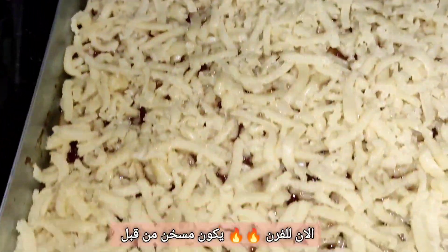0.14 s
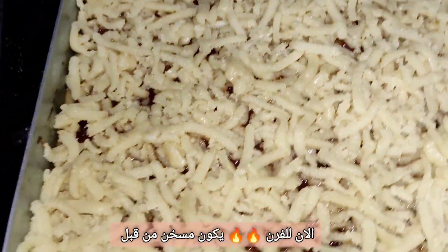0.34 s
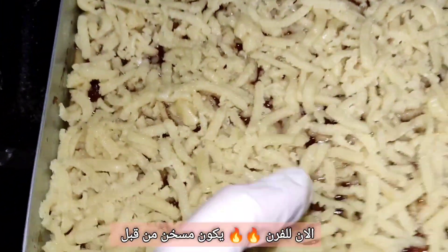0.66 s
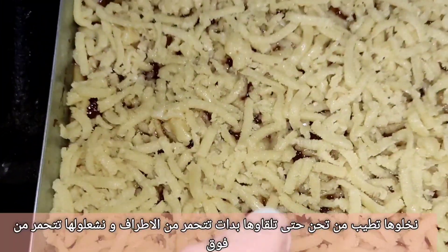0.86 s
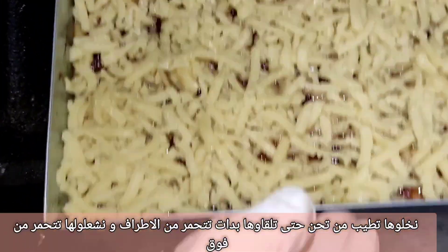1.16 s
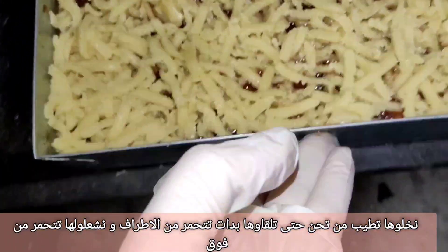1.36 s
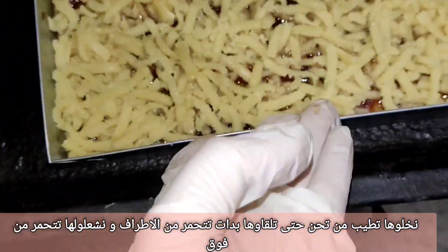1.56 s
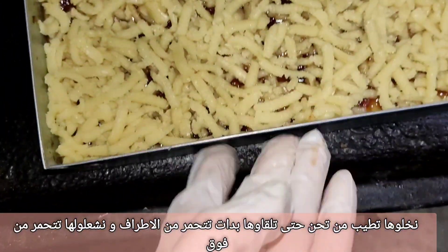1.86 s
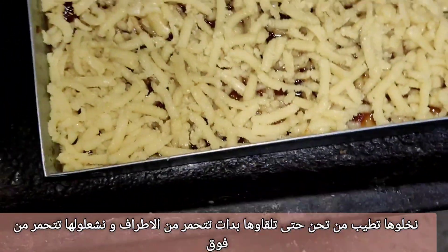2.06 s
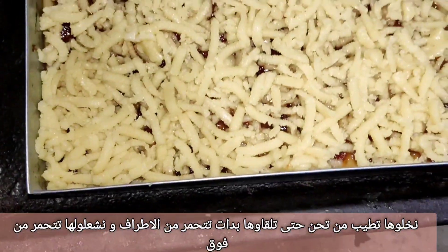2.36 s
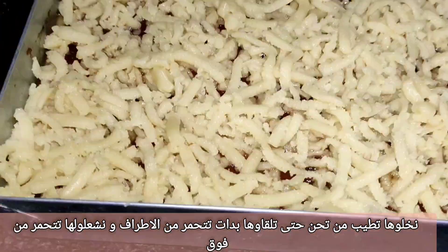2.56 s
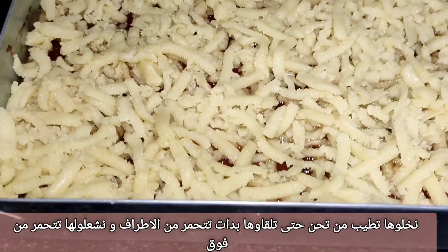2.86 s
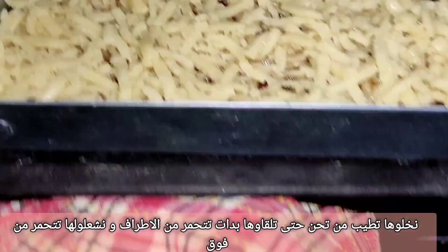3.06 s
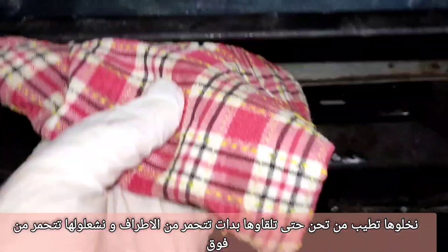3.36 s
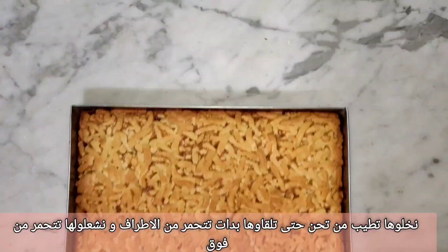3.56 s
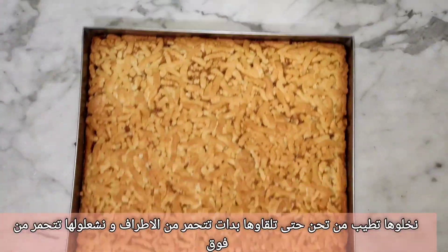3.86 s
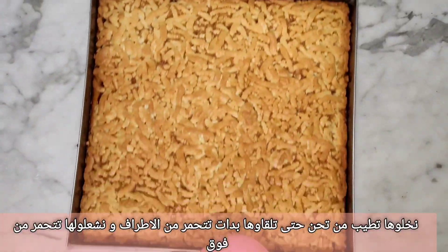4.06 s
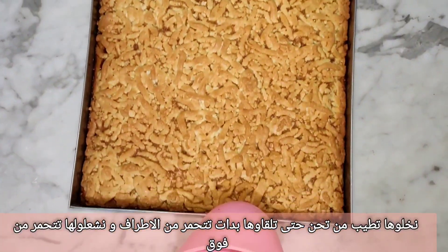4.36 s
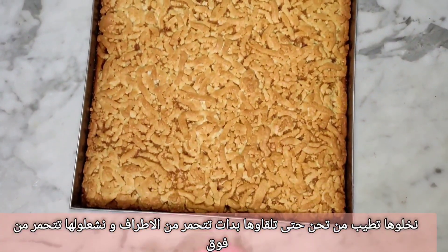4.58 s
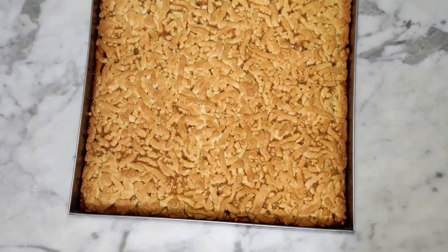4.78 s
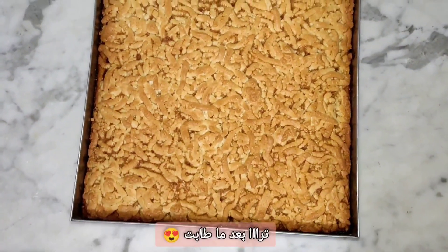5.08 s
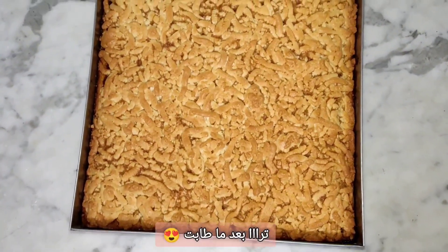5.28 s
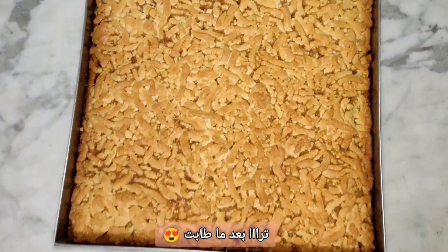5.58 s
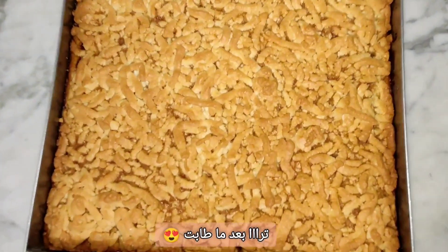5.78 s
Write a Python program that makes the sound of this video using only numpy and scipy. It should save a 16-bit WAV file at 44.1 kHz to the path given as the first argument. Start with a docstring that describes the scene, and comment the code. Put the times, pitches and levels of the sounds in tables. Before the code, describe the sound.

A low oven hum runs under the first part. At about 0.3 seconds a loaded metal baking tray starts scraping along the oven rack with small knocks, ending in the loudest, ringing clank near 0.8. A second push begins around 1.1, the rim juddering, and finishes in a clatter of ringing knocks at 1.5. A few small clicks follow. The sound drops out briefly at 2.6, then a lighter, hissing slide runs from 2.8 to 3.5, with two thuds around 3.2. At about 3.6 the sound breaks again and gives way to a quiet kitchen counter with faint electrical hum. A soft rustle lasts until about 4.4, with light taps and a faint high squeak. A soft hollow bump comes at 4.5, then tiny clicks, faint squeaks near 5 and a very thin whine to the end. The left microphone is bright, the right muffled.

```python
"""Baking tray on an oven rack

A loaded metal tray is pushed along the rack in three strokes over the oven's low hum: tiny slips
make it scrape, knocks set it ringing, its rim judders. The sound breaks off twice, then comes a
quiet kitchen counter: mains hum, a soft rustle, small taps, faint squeaks and a thin whine.
The left microphone is bright, the right one muffled."""
import sys
import numpy as np
from scipy import signal
from scipy.fft import rfft, irfft, next_fast_len
from scipy.io import wavfile

SR = 44100
rng = np.random.default_rng(int(sys.argv[2]) if len(sys.argv) > 2 else 0)


def materialize(psi):
    """Save the field psi as 16-bit PCM at rate SR to the path in sys.argv[1].

    A 1-D psi becomes a single channel; in a 2-D psi each row is a channel.
    """
    bounded = np.clip(np.atleast_2d(psi).T, -1, 1)
    quanta = np.round(bounded * 32767).astype(np.int16)
    wavfile.write(sys.argv[1], SR, quanta)


N = 261513
TIME = np.arange(N) / SR


def gain_of(db):
    return 10 ** (np.asarray(db) / 20)

def unit_rms(x):
    return x / np.sqrt(np.mean(x ** 2) + 1e-20)

def read(points, hz):
    """Look up a curve on a log-frequency axis."""
    f, value = np.transpose(points)
    return np.interp(np.log(hz + 1), np.log(f + 1), value)

def add(mix, s, sound):
    part = mix[..., round(s * SR):][..., :sound.shape[-1]]
    part += sound[..., :part.shape[-1]]

def cut(x, hz, side="low", order=2):
    return signal.sosfilt(signal.butter(order, hz, side, fs=SR, output="sos"), x)

def through(x, response):
    return signal.fftconvolve(np.atleast_2d(x), np.atleast_2d(response), axes=1)[:, :x.shape[-1]]

def eq(x, colour, size=4096):
    """Colour a sound with a minimum-phase filter of energy 1."""
    hz = abs(np.fft.fftfreq(size, 1 / SR))
    log_gain = np.log(gain_of(np.maximum(read(colour, hz), -100)))
    response = np.fft.ifft(np.exp(np.conj(signal.hilbert(log_gain)))).real[:size // 2]
    return through(x, response / np.linalg.norm(response))

def drift(per_s):
    """A smooth random wobble of rms about 1."""
    knots = np.arange(0, 7, 1 / per_s)
    return np.interp(TIME, knots, rng.standard_normal(4096)[:len(knots)])

def mode(hz, t60, lag=0):
    """One dying vibration; lag is in radians."""
    t = TIME[:33000]
    return np.sin(2 * np.pi * hz * t - lag) * gain_of(-60 * t / t60)

# Stereo image. Each row: frequency in Hz, left-right correlation.
LIKENESS = [(60, 0.79), (250, 0.87), (600, 0.48), (1100, 0.08), (3000, 0.6), (14000, 0.17)]

def spread(pair):
    """Blend two unrelated signals into stereo: narrow in the bass, wider above."""
    size = next_fast_len(pair.shape[1], True)
    left, other = rfft(pair, size)
    same = np.clip(read(LIKENESS, np.fft.rfftfreq(size, 1 / SR)), -1, 1)
    right = same * left + np.sqrt(1 - same ** 2) * other
    return irfft(np.array([left, right]), size)[:, :pair.shape[1]]

def stereo_noise(size):
    return spread(rng.standard_normal((2, size)))

def tail(decay):
    """Countless modes or echoes, each band dying at its own speed."""
    hz, t, bands = signal.stft(stereo_noise(SR // 2), SR, nperseg=256)
    out = signal.istft(bands * gain_of(-60 * t / read(decay, hz)[:, None]), SR, nperseg=256)[1]
    return out / np.linalg.norm(out[0])

def ambience(air, tones, air_db, waver_rad, flutter):
    """A bed of steady air noise and wavering hum."""
    bed = gain_of(air_db) * unit_rms(through(stereo_noise(N), 1.0) if not air else eq(stereo_noise(N), air))
    for hz, db in tones:
        level = np.sqrt(2) * gain_of(db) * (1 + flutter * drift(12))
        bed += level * np.sin(2 * np.pi * hz * TIME + waver_rad * drift(8))
    return bed

# The oven's air and hum. Each row: frequency in Hz, level in dB (relative for the air).
OVEN_AIR = [(20, -12.5), (45, -14), (75, -6.5), (110, -12.5), (200, -13.5), (240, -13), (290, -18.5),
            (450, -17.5), (700, -23.5), (1360, -31), (3200, -36.5), (6200, -44), (10800, -33), (14500, -41)]
OVEN_HUM = [(48.6, -49), (247.6, -62.5)]

def oven_hum():
    """The oven drones, low and nearly steady."""
    return ambience(OVEN_AIR, OVEN_HUM, air_db=-52.5, waver_rad=.15, flutter=.08)

# Modes of the tray on its rack. Each row: pitch in Hz, relative level in dB, t60 in seconds.
TRAY_MODES = [(77.2, -2.5, 0.31), (102.2, -1.5, 0.56), (119.2, -10.5, 0.28), (163.8, 1, 0.72),
              (190.4, 4, 0.74), (234, -5.5, 1), (342.9, -5, 0.77), (367, -3, 0.39), (445.4, -7.5, 0.64),
              (484.8, -9.5, 0.33), (526, -20, 0.17), (551, -9.5, 0.26), (622, -23, 0.72), (650, -1.5, 0.58),
              (750.5, -5.5, 0.2), (786, 1, 0.65), (901, -17, 0.46), (950, -8, 0.28), (1100, -20.5, 0.32),
              (1340, -12, .5), (1295, -8.5, 0.16), (2013, -24.5, 0.2), (2600, -9.5, 0.31),
              (2740, -10.5, .15), (3770, -12, .25), (3740, -36.5, .25)]

def tray_ring():
    """The tray's answer to one blow; each mode's phase differs between left and right."""
    ring = 0
    for k, (hz, db, t60) in enumerate(TRAY_MODES):
        apart = np.arccos(np.clip(read(LIKENESS, hz), -1, 1)) * np.array([[.5], [-.5]])
        ring = ring + (-1) ** k * gain_of(db) * mode(hz, t60, (-1) ** (k // 2) * apart)
    return ring / abs(ring).max()

def stroke(start, attack, hold, growth, release_db_per_s, onset_db=-29.5):
    """One stroke's envelope: it swells, grows or sags while the hand pushes, then dies away."""
    t = TIME - start
    swell_db = onset_db * np.clip(1 - t / attack, 0, 1) ** 2
    held_db = growth * np.clip(t - attack, 0, hold)
    fall_db = release_db_per_s * np.maximum(t - attack - hold, 0)
    return (t >= 0) * gain_of(swell_db + held_db - fall_db)

# The tray's dense upper modes. Each row: frequency in Hz, t60 in seconds.
PLATE_DECAY = [(100, 0.33), (700, 0.15), (3000, 0.25), (7000, 0.25), (14000, 0.047)]
# Rubbing strokes. Each row: kind, then start, attack and hold in seconds, push and hiss in
# relative dB, growth while held in dB per second.
STROKES = [("first", .265, 0.0037, 0.17, -26.5, -41, -8), ("first", 0.449, 0.086, 0.19, -32.5, -39.5, -39),
           ("run on", 0.787, 0.024, 0.032, -24.5, -37.5, -30),
           ("second", 1.081, 0.21, 0.13, -27.5, -31.5, 0.88),
           ("second", 1.446, 0.04, .005, -25, -29.5, -18), ("light", 2.83, .1, 0.14, -48.5, -42, 26),
           ("light", 3.05, 0.07, 0.08, -49, -37, -19.5), ("light", 3.2, 0.063, 0.065, -32, -32, -26),
           ("light", 3.33, 0.092, .13, -44.5, -38, 0), ("rustle", 3.542, 0.3, 0.49, -49, -51.5, -20)]

def rub(kind, colour, ring, slips_per_s, chatter_db, body_db, grit_db, ring_db, reach_hz, wet):
    """Tiny slips, bunched by chatter, shake the dense modes and pump the long ones up to reach_hz."""
    rows = [row[1:] for row in STROKES if row[0] == kind]
    force, hiss = 0, 0
    for s, attack, hold, push_db, hiss_db, growth in rows:
        force += gain_of(push_db) * stroke(s, attack, hold, growth, release_db_per_s=109.5)
        hiss += gain_of(hiss_db) * stroke(s, attack, hold, growth, release_db_per_s=140)
    start, end = rows[0][0], s + attack + hold + 0.46  # room for the last release
    span = slice(round(start * SR), round(end * SR))
    slips = rng.standard_normal((2, N)) * (rng.random(N) < slips_per_s / SR)
    slips *= gain_of(chatter_db * drift(220))
    slips = spread(unit_rms(slips[:, span]))
    sheet = eq(slips + wet * through(slips[0], tail(PLATE_DECAY)), colour)
    body, grit = (unit_rms(cut(sheet, 1600, side, order=3)) for side in ("low", "high"))
    drive = cut(slips[0] * force[span], reach_hz)
    ringing = signal.fftconvolve([drive], ring / np.linalg.norm(ring[0]), axes=1)
    out = np.zeros((2, N))
    add(out, start, gain_of(body_db) * force[span] * body + gain_of(grit_db) * hiss[span] * grit)
    add(out, start, gain_of(ring_db) * ringing)
    return out

# Colour of the rubbing metal, one per push. Each row: frequency in Hz, relative level in dB.
FIRST_PUSH = [(41, -24), (70, -17.5), (102, -6.5), (140, -31.5), (171, -4), (228, 3.5), (305, -14),
              (417, -5.5), (570, -10), (779, -2), (1360, -21), (2970, -26.5), (6490, -40.5), (10800, -32.5),
              (14500, -44)]
SECOND_PUSH = [(41, -58), (70, -31), (107, -38), (228, -6.5), (373, -13), (499, -2), (570, -7.5),
               (682, -7.5), (871, -7.5), (1590, -23), (2720, -23.5), (3320, -28.5), (7940, -35),
               (10600, -26.5), (14500, -39)]
LIGHT_SLIDE = [(60, -28), (120, -9.5), (190, 22.5), (300, 0.5), (800, -1.5), (1150, -4), (1700, -11),
               (2900, -6.5), (4500, -11.5), (6500, -13.5), (8500, -7), (10400, -1), (12500, -7.5),
               (14500, -14.5)]

def scrapes(ring):
    """Two heavy pushes, the first running on after its knock, and a light hissing slide."""
    out = rub("first", FIRST_PUSH, ring, slips_per_s=4500, chatter_db=1.4,
              body_db=-2, grit_db=2.5, ring_db=-5, reach_hz=4000, wet=0.91)
    out += rub("run on", FIRST_PUSH, ring, slips_per_s=2000, chatter_db=-2.9,
               body_db=2, grit_db=-0.5, ring_db=-6.5, reach_hz=2000, wet=0.82)
    out += rub("second", SECOND_PUSH, ring, slips_per_s=4000, chatter_db=3.44,
               body_db=-2.5, grit_db=-1, ring_db=-5.5, reach_hz=4000, wet=0.89)
    return out + rub("light", LIGHT_SLIDE, ring, slips_per_s=9900, chatter_db=1.1,
                     body_db=1.5, grit_db=1, ring_db=-4, reach_hz=314, wet=0.42)

# Colour of a knock's crack. Each row: frequency in Hz, relative level in dB.
CRACK_COLOUR = [(60, -11.5), (110, 6.5), (300, 0.5), (750, 5), (1400, -3.5), (2800, -10), (5500, -22.5),
                (8000, -24.5), (10500, -17.5), (14500, -32.5)]
# The tray hits the rack. Each row: start in seconds, thud in dB, thud pitch in Hz, crack in dB,
# ring in dB.
KNOCKS = [(.265, -28, 890, -20, -52), (.278, -22.5, 970, -21, -36), (0.3492, -24, 933, -19, -31),
          (0.415, -27.5, 92.8, -27.5, -22), (0.7476, -10.5, 754, -8, -22), (0.7726, -5, 731, -7, -13.5),
          (0.787, -20.5, 97.5, -16, -25), (1.1935, -29, 118, -22, -38), (1.4405, -26.5, 125, -16.5, -34),
          (1.4627, -29.5, 560, -20.5, -23), (1.4962, -21.5, 117.3, -15, -18), (1.505, -11.5, 748, -25, -25),
          (1.514, -14, 810, -18, -17), (1.536, -18.5, 366, -40, -24.5), (1.565, -20.5, 188, -40, -35),
          (1.676, -32.5, 205, -37, -30.5), (3.179, -19.5, 169, -22.5, -30),
          (3.2617, -14, 191, -21.5, -30.5), (3.265, -25, 1000, -31, -35)]

def knocks(ring, crack_t60=0.075, rise_s=0.0024, thud_cycles=36.6):
    """A short clatter of contacts, a damped thud where it strikes and the ring of the whole tray."""
    out = np.zeros((2, N))
    for s, thud_db, hz, crack_db, ring_db in KNOCKS:
        clatter = tail([(1000, crack_t60)]) + tail(PLATE_DECAY)
        rise = 1 - np.exp(-TIME[:clatter.shape[1]] / rise_s)
        crack = eq(clatter * rise, CRACK_COLOUR)
        add(out, s, gain_of(crack_db) * crack / abs(crack).max())
        add(out, s, -gain_of(thud_db) * mode(hz, thud_cycles / hz))
        add(out, s, gain_of(ring_db) * cut(ring, 4.6 * hz))  # a low knock reaches only low modes
    return out

# Colour of a hard contact. Each row: frequency in Hz, relative level in dB.
SNAP_COLOUR = [(200, -8.5), (1800, -6.5), (5500, -12), (9500, -9), (11500, -4.5), (14500, -44.5)]

def snap(t60=0.015):
    """The bright burst of a hard contact, with peak 1."""
    burst = eq(stereo_noise(2048) * gain_of(-60 * TIME[:2048] / t60), SNAP_COLOUR)
    return burst / abs(burst).max()

# Sharp little clicks. Each row: start in seconds, snap in dB, ring pitch in Hz, ring in dB.
CLICKS = [(0.704, -25, 3630, -48), (1.8135, -39.5, 10620, -35.5), (1.902, -37, 9700, -42),
          (2.4058, -46, 2900, -46), (2.5546, -38.5, 2960, -45.5), (4.571, -43, 7600, -49),
          (4.6268, -34, 1940, -28), (4.8217, -37, 2040, -40.5)]

def clicks():
    """Each click is a snap with one very short ring."""
    out = np.zeros((2, N))
    for s, snap_db, hz, ring_db in CLICKS:
        add(out, s, gain_of(snap_db) * snap())
        add(out, s, gain_of(ring_db) * mode(hz, t60=0.0064))
    return out

def fuzzy_tone(path, width_hz):
    """A narrow resonance fed by noise, gliding through points of time, pitch and level."""
    s, hz, db = np.transpose(path)
    t, out = np.arange(s[0], s[-1], 1 / SR), np.zeros(N)
    fuzz = cut(rng.standard_normal((2, 2 * SR))[:, :len(t)], width_hz / 2)
    phase = 2 * np.pi * np.cumsum(np.interp(t, s, hz)) / SR
    tone = unit_rms(fuzz[0] * np.cos(phase) + fuzz[1] * np.sin(phase))
    add(out, s[0], tone * gain_of(np.interp(t, s, db)))
    return out

def squeak(s, length, start_hz, end_hz, db, width_hz):
    """A squeak swells and fades as its pitch slides."""
    peak = (s + length / 2, (start_hz + end_hz) / 2, db)
    return fuzzy_tone([(s, start_hz, db - 12), peak, (s + length, end_hz, db - 13)], width_hz)

# Rim judders. Each row: start and length in seconds, first and last pitch in Hz, level in dB.
JUDDERS = [(1.129, 0.083, 760, 730, -30), (1.209, 0.094, 699, 653, -25), (1.286, .07, 684, 688, -25.5)]

def judders():
    """The rim judders on the rail in the second push."""
    return sum(squeak(*row, width_hz=77) for row in JUDDERS)

# Breaks in the sound. Each row: start, hold and fade-in time constant, all in seconds.
BREAKS = [(2.582, 0.03, 0.14), (3.554, 0.004, 0.069)]

def breaks(sound, floor_db=-28.5, swell_db=-39.5, swell_delay_s=0.1, swell_s=0.075):
    """The level drops at once and fades back in; a slow, deep swell follows."""
    for s, hold, fade in BREAKS:
        back = 1 - np.exp(-np.maximum(TIME - s - hold, 0) / fade)
        sound = sound * np.where(TIME < s, 1, np.maximum(back, gain_of(floor_db)))
        age = np.maximum(TIME - s - swell_delay_s, 0) / swell_s
        sound += gain_of(swell_db) * age * np.exp(1 - age)
    return sound

# The kitchen's air and hum. Each row: frequency in Hz, level in dB (relative for the air).
KITCHEN_AIR = [(20, 0), (45, -9), (75, -14.5), (140, -14.5), (200, -24), (450, -20), (750, -27),
               (1100, -31.5), (1900, -32.5), (3000, -39.5), (5500, -41.5), (9200, -34), (10500, -46.5),
               (14500, -49)]
KITCHEN_HUM = [(100, -63), (149.6, -63), (248, -69.5), (300.5, -69.5), (399, -67.5), (500.6, -82),
               (544, -69), (2073, -81.5), (9065, -90)]

def kitchen_hum():
    """Mains hum wavers over quiet room tone."""
    return ambience(KITCHEN_AIR, KITCHEN_HUM, air_db=-51.5, waver_rad=0.58, flutter=0.23)

# Colour of the rustle. Each row: frequency in Hz, relative level in dB.
RUSTLE_COLOUR = [(290, -50), (500, -10), (551, -25), (699, -20.5), (1020, -10.5), (1090, -14.5),
                 (2520, -12.5), (3110, -5), (4850, -15), (5350, -12), (8960, -11), (14000, -25.5)]

def rustle(ring):
    """One soft, bright rub with only a trace of ring."""
    return rub("rustle", RUSTLE_COLOUR, ring, slips_per_s=3000, chatter_db=0.5,
               body_db=1.5, grit_db=0, ring_db=-33, reach_hz=1000, wet=0.9)

# Light taps at the counter. Each row: start in seconds, level in dB, pitch in Hz.
TAPS = [(3.6988, -41, 855), (3.716, -39, 860), (3.872, -36, 1040), (3.9632, -37, 1200), (3.9771, -33, 1080),
        (4.2185, -45.5, 1270), (4.7769, -45.5, 1175), (4.825, -46, 1190)]

def taps(t60=0.026, snap_db=-17, overtone=2.8, overtone_db=-8.5):
    """A faint snap sets two short modes ringing."""
    out = np.zeros((2, N))
    for s, db, hz in TAPS:
        add(out, s, gain_of(db + snap_db) * snap())
        add(out, s, gain_of(db) * (mode(hz, t60) + gain_of(overtone_db) * mode(overtone * hz, t60)))
    return out

# High squeaks. Each row: start and length in seconds, first and last pitch in Hz, level in dB.
SQUEAKS = [(3.74, 0.15, 5630, 5160, -57.5), (4.932, 0.091, 5300, 5150, -62), (4.941, 0.21, 3980, 3730, -62)]

def high_squeaks():
    """Faint, breathy squeaks that sag in pitch."""
    return sum(squeak(*row, width_hz=570) for row in SQUEAKS)

# Modes of the bump. Each row: pitch in Hz, level in dB, t60 in seconds.
BUMP_MODES = [(285, -33.5, 0.076), (418, -34, 0.047), (724, -37, 0.0091)]

def bump(start_s=4.46):
    """One soft, hollow bump of quickly damped modes."""
    out = np.zeros(N)
    body = sum(gain_of(db) * mode(hz, t60) for hz, db, t60 in BUMP_MODES)
    add(out, start_s, cut(body, 222, "high"))
    return out

# Path of the whine. Each row: time in seconds, pitch in Hz, level in dB.
WHINE = [(4.9, 9500, -84), (5.65, 9420, -75), (5.93, 9370, -69)]

def whine():
    """A thin whine creeps up in level."""
    return fuzzy_tone(WHINE, width_hz=99)

# The kitchen's reverb. Each row: frequency in Hz, t60 in seconds.
ROOM_DECAY = [(150, 0.33), (1500, 0.27), (5000, 0.26), (14000, 0.029)]

def room(sound, wet_db=-2):
    """The kitchen throws back a short tail of echoes."""
    return sound + gain_of(wet_db) * through(sound, tail(ROOM_DECAY))

def scene(counter_from_s=3.556):
    """The oven gives way to the counter; clicks, taps and the bump sit on top."""
    ring = tray_ring()
    oven = scrapes(ring) + knocks(ring) + judders() + oven_hum()
    counter = kitchen_hum() + rustle(ring) + high_squeaks() + whine()
    return np.where(TIME < counter_from_s, oven, counter) + room(clicks() + taps() + bump())

# Tilt between the microphones. Each row: frequency in Hz, left minus right in dB.
MIC_TILT = [(50, -1), (180, -1), (450, 2.5), (800, 2.5), (1200, 7), (2000, 12.5), (4000, 19), (7000, 23),
            (10500, 30), (14000, 26)]

def record(dry, hiss_db=-68, top_hz=14400):
    """One bright and one muffled microphone, their own hiss, the two breaks and the band limit."""
    tilt = gain_of(read(MIC_TILT, np.fft.rfftfreq(N, 1 / SR)))
    balance = np.array([2 * tilt, 2 * np.ones_like(tilt)]) / (1 + tilt)
    heard = irfft(rfft(dry) * balance, N)
    heard += gain_of(hiss_db) * rng.standard_normal((2, N))
    lowpass = signal.firwin(511, top_hz, window=("kaiser", 9), fs=SR)
    return signal.oaconvolve(breaks(heard), lowpass[None], "same")


dry = scene()
out = record(dry)
materialize(out)
```